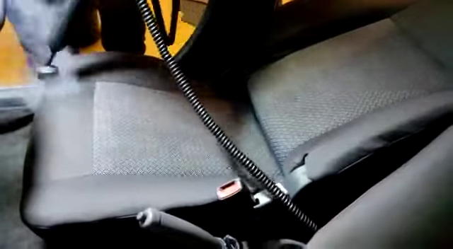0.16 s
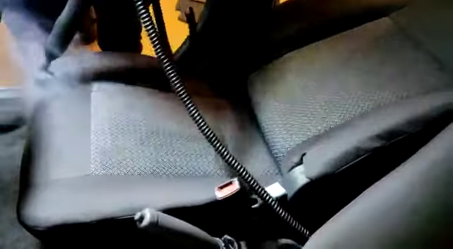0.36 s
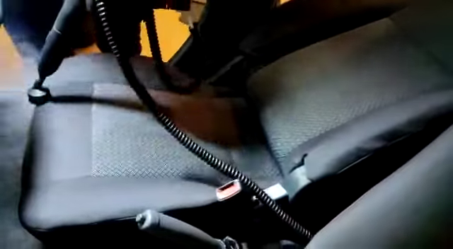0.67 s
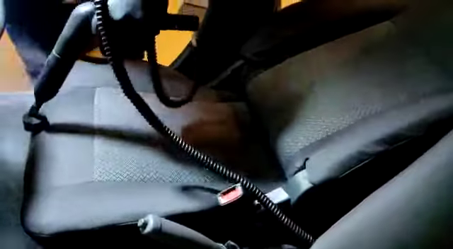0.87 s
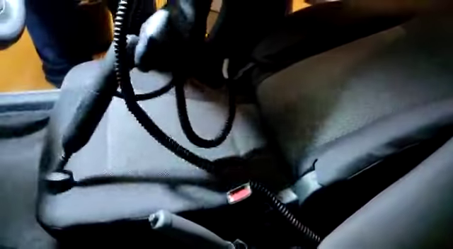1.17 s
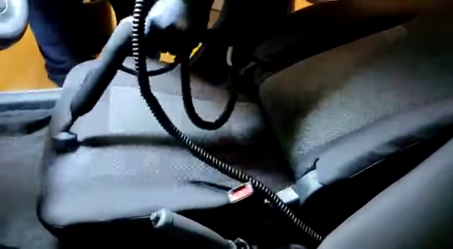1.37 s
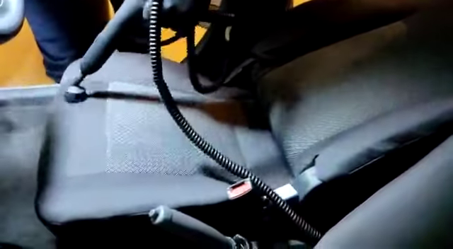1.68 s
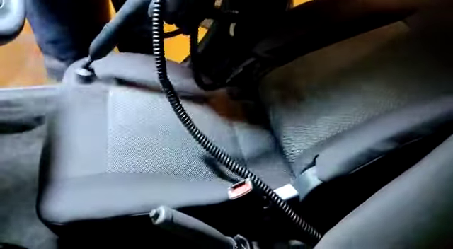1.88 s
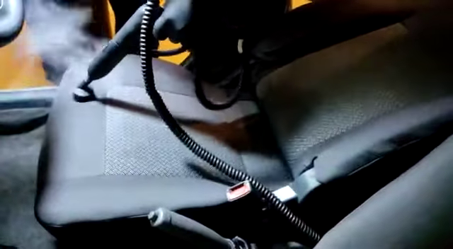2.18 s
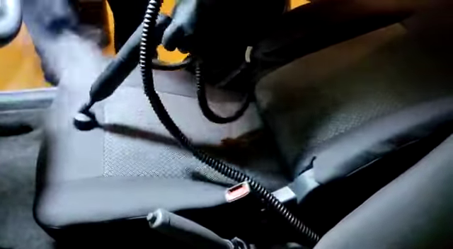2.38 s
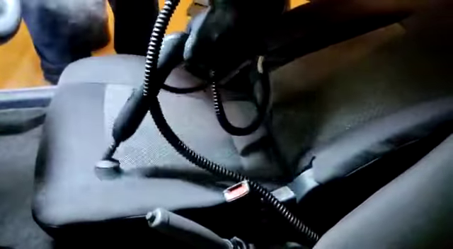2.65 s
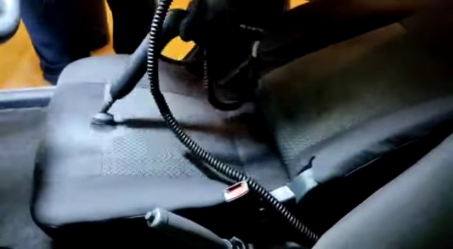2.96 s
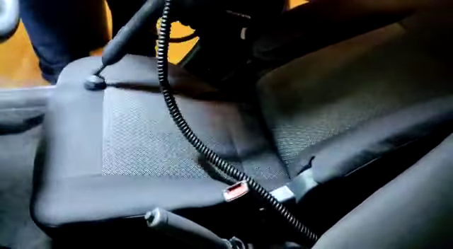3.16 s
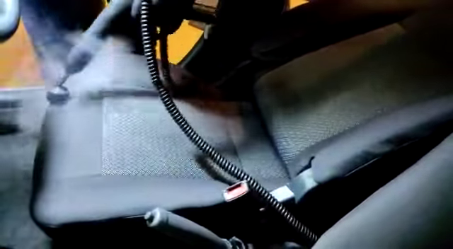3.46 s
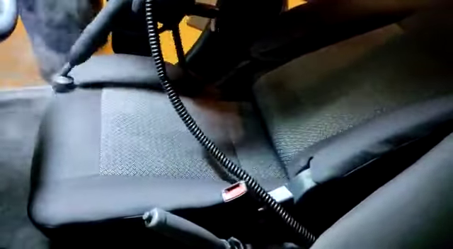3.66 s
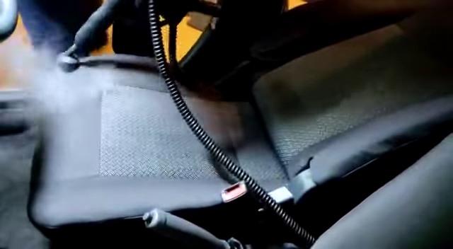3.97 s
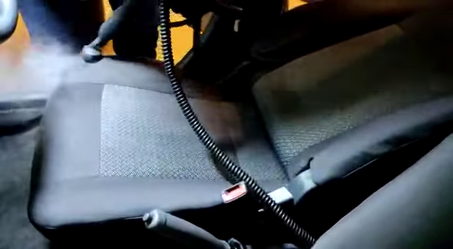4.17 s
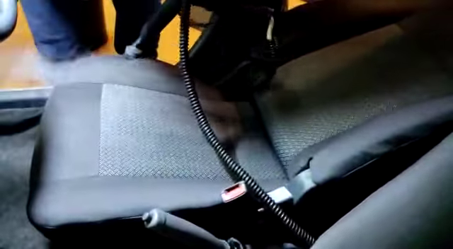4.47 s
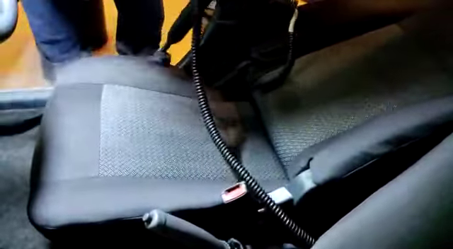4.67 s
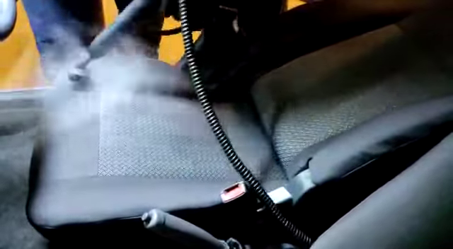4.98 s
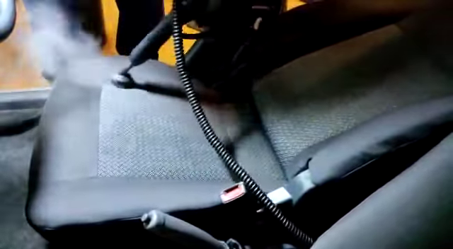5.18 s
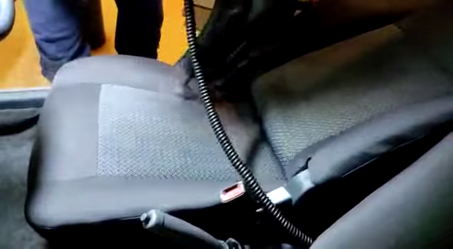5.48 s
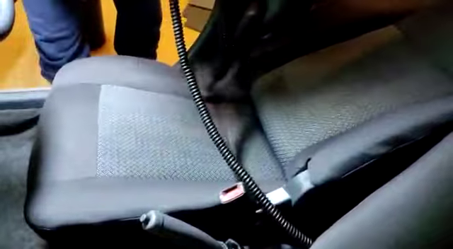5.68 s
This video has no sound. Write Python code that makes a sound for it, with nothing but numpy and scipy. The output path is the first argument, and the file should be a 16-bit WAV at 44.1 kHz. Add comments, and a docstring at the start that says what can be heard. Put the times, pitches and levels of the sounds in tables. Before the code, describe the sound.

A steam cleaner wand hisses continuously over a car seat, an arm's length from a phone. The bright, sharp jet surges and dips, sometimes hollow. Billows of steam rumble against the microphone, stronger on the left, with short low thumps. Cloth scuffs and dry ticks come between one and one and a half seconds and again just before three. A faint workshop hum lies beneath.

```python
"""A steam cleaner's wand is swept over a fabric car seat, an arm's length from a phone's two microphone ports.
From the start: coloured noise hisses as the jet, noise rumble swells with steam and a workshop hums behind.
Soon dense snaps crackle as cloth scuffs, billows buffet the ports and pitch-sinking sine thumps strike them.
Then the hiss level surges and dips, slow sine bumps push mostly the left port, and noise rasps tick on the weave.
Resonances of the two ports colour it all."""
import sys
import numpy as np
from scipy import signal
from scipy.fft import rfft, irfft, next_fast_len
from scipy.io import wavfile
from scipy.ndimage import uniform_filter1d, map_coordinates

SR = 44100
rng = np.random.default_rng(int(sys.argv[2]) if len(sys.argv) > 2 else 0)


def output_pcm(signal):
    """Save a mono or channel-first signal as 16-bit PCM at the path in sys.argv[1].

    Samples are clipped to [-1, 1] before scaling.
    """
    pcm = np.clip(np.atleast_2d(signal).T, -1, 1) * 32767
    wavfile.write(sys.argv[1], SR, np.round(pcm).astype(np.int16))


N = 257544
TIME = np.arange(N) / SR


def undb(db):
    """Decibels to gain."""
    return 10 ** (np.asarray(db) / 20)


def unit(x):
    """Scale to rms 1."""
    return x / np.sqrt(np.mean(x ** 2))


def curve(points):
    """Join (time_s, value) points by straight lines over the scene."""
    return np.interp(TIME, *np.transpose(points))


def span(from_s, to_s):
    """Slice of samples between two times."""
    return slice(*np.searchsorted(TIME, [from_s, to_s]))


def colour(x, points):
    """Filter by (freq_hz, gain_db) points joined on a log-frequency axis."""
    hz, db = np.transpose(points)
    size = next_fast_len(N, real=True)
    bins_hz = np.maximum(np.fft.rfftfreq(size, 1 / SR), 1)
    gain = undb(np.interp(np.log(bins_hz), np.log(hz), db))
    return irfft(rfft(x, size) * gain, size)[..., :N]


def walk(rate_hz):
    """Smooth random curve through rate_hz new values a second; rms 1."""
    coarse_s = np.linspace(0, N / SR, num=8192)
    values = rng.standard_normal(8192)
    steps = map_coordinates(values, [coarse_s * rate_hz], order=3, mode="wrap")
    return unit(np.interp(TIME, coarse_s, steps))


def swell(mid_s, peak_db, length_s):
    """Power of a Gaussian puff; amplitude is 1/e of its peak at half a length from the middle."""
    power = np.zeros(N)
    near = span(mid_s - 2 * length_s, mid_s + 2 * length_s)
    power[near] = undb(peak_db) ** 2 * np.exp(-2 * (2 * (TIME[near] - mid_s) / length_s) ** 2)
    return power


def delayed(sounds, lag_ms):
    """Read sounds through a moving delay."""
    return np.array([np.interp(TIME - lag_ms / 1000, TIME, x) for x in sounds])


FIRST_BOUNCE_S, BOUNCE_FADE_S, REDRAW_S = .0025, .011, .16
DIFFUSE_SHARE, BOUNCE_SHARE = 0.45, 0.95


def bounced_hisses(port_lag_ms=0.2838, lag_sway_ms=0.069, count=4, tail_samples=1600):
    """Short random bounces, redrawn at a steady step and crossfaded, give each hiss a shifting colour."""
    x = rng.standard_normal((count, N))
    direct = np.stack([delayed(x, port_lag_ms + lag_sway_ms * walk(2)), x], axis=1)
    out = direct + DIFFUSE_SHARE * rng.standard_normal((count, 2, N))
    age_s = np.arange(tail_samples) / SR
    decay = np.exp(-age_s / BOUNCE_FADE_S) * (age_s > FIRST_BOUNCE_S)
    for step_s in np.arange(0, TIME[-1] + REDRAW_S / 2, REDRAW_S):
        near = span(step_s - REDRAW_S, step_s + REDRAW_S)
        # equal-power crossfade between draws
        blend = np.cos(np.pi / 2 * (TIME[near] - step_s) / REDRAW_S)
        bounces = rng.standard_normal((2, tail_samples)) * decay
        bounces = BOUNCE_SHARE * bounces / np.linalg.norm(bounces, axis=1, keepdims=True)
        spray = signal.fftconvolve(x[:, None, near], bounces[None], axes=-1)
        out[..., near] += blend * spray[..., :len(blend)]
    return out


# jet openness towards the phone, as top hiss level before trim: time_s [s], level_db [dB]
OPENNESS = [(0, -34.5), (.85, -38.5), (1.4, -33.5), (1.85, -38.5), (1.97, -38), (2.3, -40.5), (2.6, -33),
            (2.88, -33), (3.17, -37.5), (3.42, -34), (3.7, -39.5), (3.78, -33.5), (4.2, -36.5),
            (4.7, -42.5), (4.8, -34), (5.15, -37.5), (5.27, -39.5), (5.84, -48)]
# steam spreading over the cloth, before trim: time_s [s], level_db [dB]
WASH = [(0, -29.5), (.15, -30), (.42, -34), (0.618, -29.5), (0.799, -35.5), (1.0, -32), (1.7, -33.5),
        (2.179, -29), (2.601, -33), (2.8, -32), (3.11, -37.5), (3.37, -27), (3.66, -35.5), (3.789, -30.5),
        (4.679, -32), (4.8, -25.5), (4.96, -31.5), (5.271, -34), (5.38, -27), (5.53, -27), (5.76, -22.5),
        (5.84, -26.5)]
# steam caught under the nozzle's cup, before trim: time_s [s], level_db [dB]
CUP = [(0.0, -34), (0.18, -28.5), (0.45, -38), (1.46, -31.5), (1.63, -38), (1.87, -39), (3.25, -36.5),
       (3.42, -29.5), (3.71, -38), (3.759, -32.5), (4.441, -34), (4.65, -41), (4.861, -29.5), (4.94, -39),
       (5.059, -30.5), (5.2, -40), (5.77, -33.5), (5.84, -38)]
# relative spectra of main jet, fine top, wash, cup note: freq_hz [Hz], gain_db [dB]
JET_COLOUR = [(400, -34), (1500, -17.5), (3000, -6), (5000, -10), (6500, 0), (9000, 2), (10500, -20),
              (13000, -18.5)]
TOP_COLOUR = [(3000, -45), (6000, -19), (8000, 3), (10500, -2), (16000, -10.5), (20000, -32)]
WASH_COLOUR = [(500, -18.5), (1500, -13.5), (2600, -7), (3600, -0.5), (5500, -2), (7000, -4),
               (12000, -22.5)]
CUP_COLOUR = [(500, -20), (1000, -12.5), (1550, -13), (2050, -2), (2450, 1), (2900, 9), (3350, -2),
              (3900, -10), (6000, -30)]
# the jet follows openness by a share and loses a little as the wand turns away
JET_DB, JET_OPEN_SHARE, JET_FADE_DB_PER_S = -22.5, 0.2, 0.16
CUP_WANDER_SHARE, WAVER_DB = .025, .4


def steam(top_trim_db=7.0, wash_trim_db=4.0, cup_trim_db=2.0, sputter_db=0.62, sway_db=0.5,
          left_over_right_db=0.14, spread_share=0.68, flutter_db=1.92):
    """Turbulent hiss: jet and fine top in the open, wash on the cloth, hollow note under the nozzle's cup."""
    open_db, spread_db, hollow_db = curve(OPENNESS), curve(WASH), curve(CUP)
    jet_db = JET_DB + JET_OPEN_SHARE * (open_db - np.mean(open_db)) - JET_FADE_DB_PER_S * TIME
    jet, top, wash, cup = bounced_hisses()
    jet = unit(colour(jet, JET_COLOUR)) * undb(jet_db)
    top = unit(colour(top, TOP_COLOUR)) * undb(open_db + top_trim_db)
    wash = unit(colour(wash, WASH_COLOUR)) * undb(spread_db + wash_trim_db)
    # the gap under the cup opens and closes: uneven read speed bends the note
    pace = np.cumsum(1 + CUP_WANDER_SHARE * walk(11)) % N
    cup = np.array([np.interp(pace, np.arange(N), x) for x in colour(cup, CUP_COLOUR)])
    cup = unit(cup) * undb(hollow_db + cup_trim_db)
    # nozzle rides over the weave
    wash = wash * undb(flutter_db * walk(45))
    # unsteady hand: left-right balance and common level
    balance_db = np.outer([1, -1], left_over_right_db + sway_db * walk(16)) / 2
    sides = undb(balance_db + WAVER_DB * walk(16))
    # condensate in the nozzle makes the flow unsteady
    flow = undb(sputter_db * walk(220))
    # these change the sharp hiss most, the wash and cup less
    level_swells = swells()
    sharp = (jet + top) * level_swells
    spread = (wash + cup) * level_swells ** spread_share
    return (sharp + spread) * sides * flow


# relative room noise spectrum: freq_hz [Hz], gain_db [dB]
SHOP_COLOUR = [(20, 9), (50, 6.5), (100, -25), (160, -9), (260, -3.5), (400, -12), (1000, -9),
               (1600, -10.5), (3000, -18), (8000, -68)]
# idling machines: pitch_hz [Hz, mean], level_db [dB rms]
HUM = [(158, -46.5), (266, -58.5), (530, -54)]


def workshop(room_db=-40, waver_db=2, wander_hz=1.68):
    """Low, uneven room noise plus machine tones of slightly wandering pitch."""
    room = unit(colour(rng.standard_normal((2, N)), SHOP_COLOUR))
    room = room * undb(room_db + waver_db * np.array([walk(9.3), walk(6.4)]))
    hum = np.zeros((2, N))
    for pitch_hz, level_db in HUM:
        turns = np.cumsum(pitch_hz + wander_hz * walk(10)) / SR + rng.random((2, 1))
        hum += undb(level_db) * np.sqrt(2) * np.sin(2 * np.pi * turns)
    return room + hum


# relative eddy spectrum: freq_hz [Hz], gain_db [dB]
GUST_COLOUR = [(30, -2.5), (100, -1.5), (165, 4), (230, 1), (320, -4), (450, -13), (650, -24),
               (1000, -28.5), (2000, -96), (5000, -70)]


def buffeting(port, trim_db=-0.5, eddy_db=1.85, draught_db=-46, eddy_pitch=0.99, pitch_rise=.19,
              heave_db=-10.0, heave_growth=0.54):
    """Billows, wisps and draught shed eddies on one port; the faster they blow, the higher the rumble."""
    draught = undb(draught_db + 1.16 * walk(14)) ** 2
    push = np.sqrt(draught + billows(port) + wisps(port))
    usual = np.sqrt(np.mean(push ** 2))
    flurry = push * unit(undb(eddy_db * walk(90)))
    # stronger push reads the noise faster
    shedding = np.cumsum(eddy_pitch * (flurry / usual) ** pitch_rise)
    rumble = colour(rng.standard_normal(N), GUST_COLOUR)
    eddies = np.interp(shedding % N, np.arange(N), rumble)
    # even out over a few eddies so the push sets the strength
    eddies = eddies / np.sqrt(uniform_filter1d(eddies ** 2, size=1600))
    # the whole cloud heaves below the eddies, more evenly
    heave_colour = [(8, -16), (25, 5.0), (70, 2.5), (120, -9.0), (250, -13.0), (1000, -78)]
    heave = unit(colour(rng.standard_normal(N), heave_colour))
    heave = undb(heave_db) * usual * (push / usual) ** heave_growth * heave
    return undb(trim_db) * flurry * eddies + heave


# wisp level while the cloud hangs near the phone, before trim: time_s [s], level_db [dB]
CLOUD = [(0, -32), (.25, -24), (.6, -28.5), (1.6, -26), (1.9, -34.5), (2.15, -26), (2.48, -25), (2.65, -31),
         (3.2, -32), (3.4, -26), (3.65, -32), (3.87, -31), (4.2, -36.5), (4.33, -47.5), (4.56, -47),
         (4.62, -27), (5.4, -23), (5.65, -28.5), (5.84, -33)]
WISPS_PER_S, WISP_LENGTH_S, WISP_SCATTER_DB = 14, .055, 3


def wisps(port, trim_db=-2, right_db=-2):
    """Power of small puffs at one port, each at a random moment of its own time slot."""
    chance = rng.random((round(WISPS_PER_S * N / SR), 2))
    puffs = np.zeros(N)
    for slot, (when, size) in enumerate(chance):
        puffs += swell((slot + when) / WISPS_PER_S, WISP_SCATTER_DB * (2 * size - 1), WISP_LENGTH_S)
    return puffs / np.mean(puffs) * undb(curve(CLOUD) + trim_db + port * right_db) ** 2


# wet nozzle scuffs the cloth: mid_s [s], level_db [dB, left], length_s [s]
SCUFFS = [(0.079, -27.5, .024), (0.133, -29.5, 0.035), (1.116, -31.5, 0.047), (1.18, -34, 0.055),
          (1.36, -32.5, 0.069), (1.415, -27, 0.028), (1.434, -29, 0.05), (1.574, -35, .03),
          (2.796, -30, 0.09), (2.873, -29, 0.095), (4.932, -30.5, 0.013)]
# relative crackle spectrum: freq_hz [Hz], gain_db [dB]
SCUFF_COLOUR = [(150, -14), (400, 14), (650, 12.5), (900, 15), (1500, 9.5), (2500, 11.5), (6000, -47)]


def scuffs(grain_db=3, right_db=-9, snags_per_s=900):
    """Fibres snag on the nozzle and snap free in a dense crackle."""
    pressure = np.sqrt(sum(swell(*row) for row in SCUFFS))
    snags = (rng.random((2, N)) < snags_per_s / SR) * rng.choice([-1, 1], (2, N))
    sizes = undb(grain_db * np.minimum(rng.exponential(size=(2, N)), 4))
    return unit(colour(snags * sizes, SCUFF_COLOUR)) * pressure * undb([[0], [right_db]])


# big billows, before buffeting's trim: mid_s [s], port [0 left, 1 right], level_db [dB], length_s [s]
GUSTS = [(0.084, 0, -17.5, 0.04), (0.142, 0, -20, 0.04935), (0.242, 1, -23, 0.027),
         (0.268, 0, -17.5, 0.04516), (0.326, 1, -25, 0.0792), (0.368, 0, -16.5, 0.03006),
         (0.494, 1, -24, 0.0601), (0.602, 0, -22, 0.01945), (0.654, 0, -17.5, 0.0603),
         (0.706, 0, -15.5, 0.05497), (0.854, 0, -16, 0.0619), (.905, 0, -18, 0.0381),
         (.906, 1, -20.5, 0.056), (1.057, 0, -15.5, 0.03997), (1.103, 0, -19, 0.04465),
         (1.207, 1, -19.5, 0.052), (1.236, 0, -21, .025), (1.278, 0, -18, 0.0502), (1.336, 0, -23, 0.058),
         (1.417, 0, -15, 0.02156), (1.449, 0, -16.5, 0.0421), (1.544, 0, -13.5, 0.0851),
         (1.573, 1, -23, 0.057), (1.64, 0, -18.5, 0.0266), (1.764, 0, -17.5, 0.03524),
         (1.99, 0, -15.5, 0.0295), (2.072, 0, -14.5, 0.04123), (2.14, 0, -19, 0.0563),
         (2.244, 0, -16.5, 0.0652), (2.358, 0, -15, 0.06115), (2.483, 1, -22.5, 0.07616),
         (2.79, 0, -19, 0.0718), (2.878, 0, -17, 0.0785), (2.915, 1, -22.5, 0.07754),
         (3.182, 0, -17, 0.0296), (3.329, 0, -14.5, 0.0617), (3.381, 0, -19, 0.0404),
         (3.465, 0, -19.5, 0.0597), (3.545, 0, -19.5, 0.0508), (3.732, 0, -22, 0.0498),
         (3.856, 1, -25, 0.073), (3.97, 0, -19, .05), (4.128, 0, -25, 0.03956), (4.228, 0, -22.5, .09),
         (4.617, 0, -24, 0.0295), (4.714, 0, -15.5, 0.0696), (4.768, 0, -18, 0.031),
         (4.834, 0, -20.5, 0.0438), (4.921, 0, -16.5, 0.0686), (4.968, 1, -20.5, 0.03595),
         (5.087, 1, -21, 0.0697), (5.178, 0, -23, 0.049), (5.274, 0, -17, 0.0425),
         (5.363, 0, -19.5, 0.0335), (5.451, 1, -15, .035), (5.503, 0, -15, .115), (5.592, 1, -24, 0.0672)]
CROSSING_S, CROSSING_DB = 0.03486, -12


def billows(port):
    """Power of big billows at one port: its own, and later, weaker ones drifting over from the other."""
    power = np.zeros(N)
    for mid_s, side, level_db, length_s in GUSTS:
        if round(side) == port:
            power += swell(mid_s, level_db, length_s)
        else:
            power += swell(mid_s + CROSSING_S, level_db + CROSSING_DB, length_s)
    return power


# tight eddies striking a port squarely: start_s [s], port [0 left, 1 right], peak_db [dB, ring envelope],
# pitch_hz [Hz, at the start]
THUMPS = [(.085, 0, -13, 570), (.700, 0, -11.5, 446), (0.855, 0, -12, 487), (0.906, 0, -20, 400),
          (1.057, 0, -13.5, 447), (1.418, 0, -14, 395.3), (1.543, 0, -12, 503), (1.568, 0, -15, 560.6),
          (2.067, 0, -15, 520), (2.265, 0, -12, 520.3), (2.368, 0, -15, 431.8), (2.848, 0, -6, 541),
          (3.179, 0, -17, 398.8), (3.321, 0, -13, 361.7), (4.728, 0, -28, 415), (4.929, 0, -14, 558.3),
          (5.271, 0, -9.5, 350), (5.442, 1, -3.5, 435), (5.452, 1, -8, 563.5), (5.523, 0, -16, 391)]
# relative slap spectrum: freq_hz [Hz], gain_db [dB]
SLAP_COLOUR = [(200, -19), (500, 14), (850, -7), (1300, -6), (2200, -41), (5000, -60)]


def thumps(rise_s=0.00035, fade_s=0.0026, sag=0.23, slap_db=-10.5, slap_fade_s=0.0024):
    """A hard puff slaps the port, rings for a few cycles and sinks in pitch as it slows."""
    rings, slaps = np.zeros((2, N)), np.zeros((2, N))
    for start_s, port, peak_db, pitch_hz in THUMPS:
        age_s = np.clip(TIME - start_s, 0, 20 * fade_s)
        # pitch glides from pitch_hz down by the share sag
        turns = pitch_hz * ((1 - sag) * age_s + sag * fade_s * (1 - np.exp(-age_s / fade_s)))
        attack = 1 - np.exp(-age_s / rise_s)
        envelope = attack * np.exp(-age_s / fade_s)
        rings[round(port)] += undb(peak_db) * envelope / envelope.max() * np.sin(2 * np.pi * turns)
        slaps[round(port)] += undb(peak_db + slap_db) * attack * np.exp(-age_s / slap_fade_s)
    return rings + slaps * unit(colour(rng.standard_normal((2, N)), SLAP_COLOUR))


# brief surges and dips of the hiss level at each port: mid_s [s], left_db [dB], right_db [dB], length_s [s]
SWELLS = [(0.413, -2.5, -0.5, 0.23), (.8, -1.5, -1.5, 0.15), (0.91, -3, 2, 0.13), (1.206, -5, -2.5, .035),
          (1.612, -5, 0, 0.15), (1.843, -5, -2.5, 0.033), (1.917, 3, 2, 0.08), (2.055, -2, -2.5, 0.072),
          (2.19, 2, 0.5, 0.13), (2.367, -3.5, 0.3, 0.36), (2.564, 2, -2.5, 0.095), (2.934, -3, 0, .15),
          (3.129, -1, -2, 0.11), (3.33, -2.5, 1, 0.061), (3.772, 0, 2.5, 0.059), (3.896, -7, -4, 0.062),
          (3.947, 0.5, -3, .04), (4.242, -1.5, 0, 0.097), (4.332, 3, -1, 0.041), (4.42, 3, -1.5, 0.084),
          (4.52, 4, 2, 0.087), (4.682, -3, -1, 0.15), (4.804, 0, 2, 0.08), (4.946, -5, -2, 0.11),
          (5.289, -5.5, -1, 0.15), (5.382, -3.5, 3, 0.078), (5.497, -1, -10.5, 0.21),
          (5.67, -2.5, -3, 0.092)]


def swells():
    """Gain of the hiss at each port through its brief surges and dips."""
    gain_db = np.zeros((2, N))
    for mid_s, left_db, right_db, length_s in SWELLS:
        gain_db += np.outer([left_db, right_db], swell(mid_s, 0, length_s))
    return undb(gain_db)


# deep, round bumps of air: start_s [s], peak_db [dB, left envelope], pitch_hz [Hz], fade_s [s]
BUMPS = [(.829, -18, 200, 0.0081), (.887, -14, 185, .007), (.899, -15, 190, .009),
         (1.446, -13, 210, 0.0075), (2.226, -13, 166, 0.006), (2.252, -6.5, 215.1, .01),
         (2.88, -11, 170, 0.013), (3.177, -12, 177, 0.014), (3.304, -13, 149.4, 0.0055),
         (3.318, -11, 224, 0.015), (4.70, -14.5, 165.4, .015), (5.268, -12, 168, .012)]


def bumps(rise_s=0.00061, right_db=-18):
    """A firm puff sets the air at the port swinging for a few slow cycles, mostly on the left."""
    out = np.zeros(N)
    for start_s, peak_db, pitch_hz, fade_s in BUMPS:
        near = span(start_s, start_s + 10 * fade_s)
        age_s = TIME[near] - start_s
        envelope = (1 - np.exp(-age_s / rise_s)) * np.exp(-age_s / fade_s)
        swing = np.sin(2 * np.pi * pitch_hz * age_s)
        out[near] += undb(peak_db) * envelope / envelope.max() * swing
    return out * undb([[0], [right_db]])


# nozzle rim catches on the weave and lets go: start_s [s], level_db [dB, left]
TICKS = [(1.062, -27), (1.086, -28), (1.119, -25), (1.19, -30), (1.273, -22), (1.296, -22), (1.315, -27),
         (1.344, -20), (1.404, -26), (1.416, -23), (1.438, -20), (1.445, -21), (1.495, -27), (1.575, -28.5),
         (1.633, -23), (2.765, -23), (2.796, -22), (2.812, -23), (2.837, -26), (2.862, -22), (2.875, -23),
         (2.907, -21)]
# relative rasp spectrum: freq_hz [Hz], gain_db [dB]
TICK_COLOUR = [(200, -19), (550, 1.5), (1000, 1), (1600, -8.5), (2400, -8), (5000, -31)]


def ticks(fade_s=0.0034, right_db=-9):
    """Each catch of the rim is a short dry rasp of decaying noise."""
    envelope = np.zeros(N)
    for start_s, level_db in TICKS:
        near = span(start_s, start_s + 10 * fade_s)
        envelope[near] += undb(level_db) * np.exp(-(TIME[near] - start_s) / fade_s)
    rasp = unit(colour(rng.standard_normal((2, N)), TICK_COLOUR))
    return rasp * envelope * undb([[0], [right_db]])


def scene():
    """Steam, scuffs, ticks and room, plus the wind on each port."""
    wind = np.array([buffeting(port) for port in range(2)]) + thumps() + bumps()
    return steam() + scuffs() + ticks() + workshop() + wind


# resonances of the air in each microphone port: freq_hz [Hz], left_db [dB], right_db [dB]
PORTS = [(980, 1.5, -1), (2980, -0.5, -2), (3470, -1, -4.5), (4540, 1.8, 0.8), (6170, 2, 2.5),
         (6990, 3.5, 8), (7650, 6.5, 14), (8380, 8.5, 8.5), (8930, 13, 1), (9830, 7, 7), (10200, 4.5, 1.4),
         (15400, 5, 5.5)]
TOP_HZ, CEILING = 15750, .95


def record(dry):
    """Each port colours its channel; the phone rounds the highest peaks and cuts the top."""
    hz, *gains_db = np.transpose(PORTS)
    heard = np.array([colour(x, np.column_stack([hz, db])) for x, db in zip(dry, gains_db)])
    heard = heard / (1 + (heard / CEILING) ** 8) ** (1 / 8)
    top_cut = signal.ellip(10, .2, 80, TOP_HZ, fs=SR, output="sos")
    return signal.sosfilt(top_cut, heard)


dry = scene()
out = record(dry)
output_pcm(out)
```